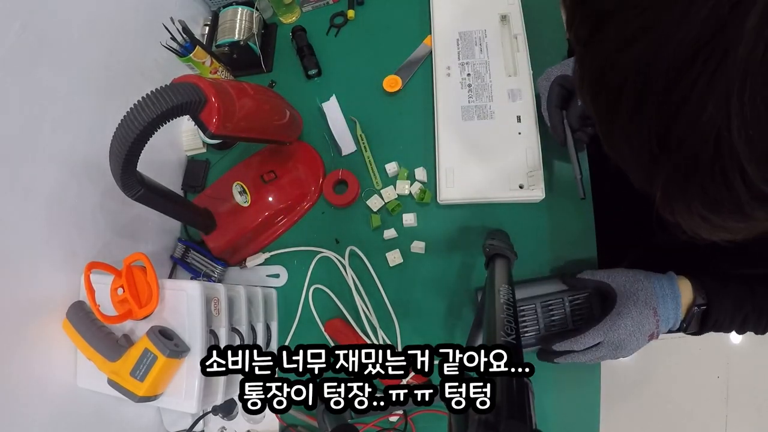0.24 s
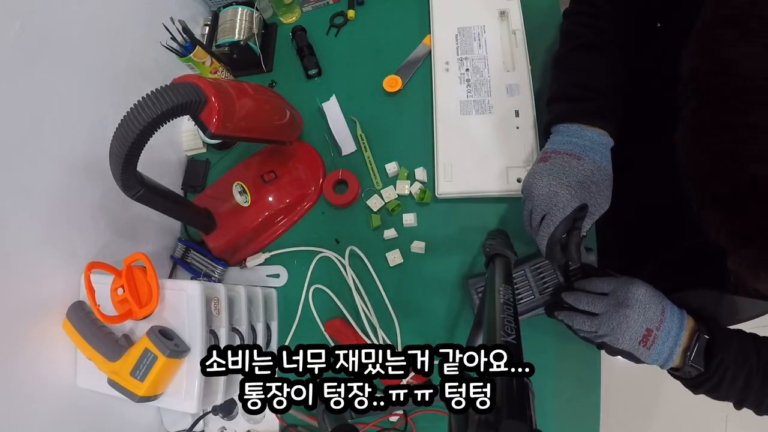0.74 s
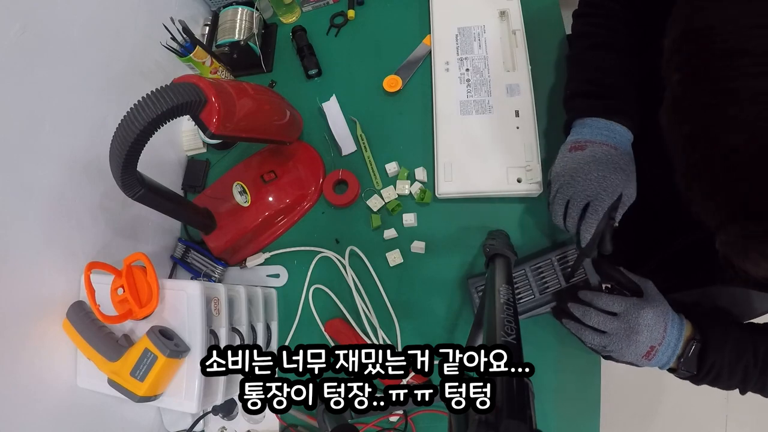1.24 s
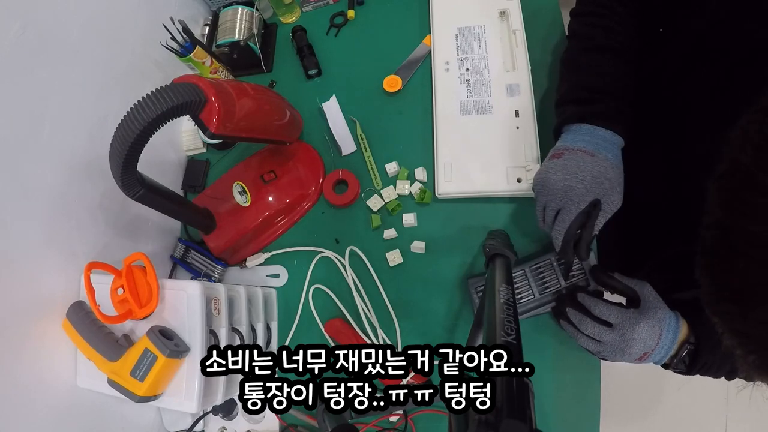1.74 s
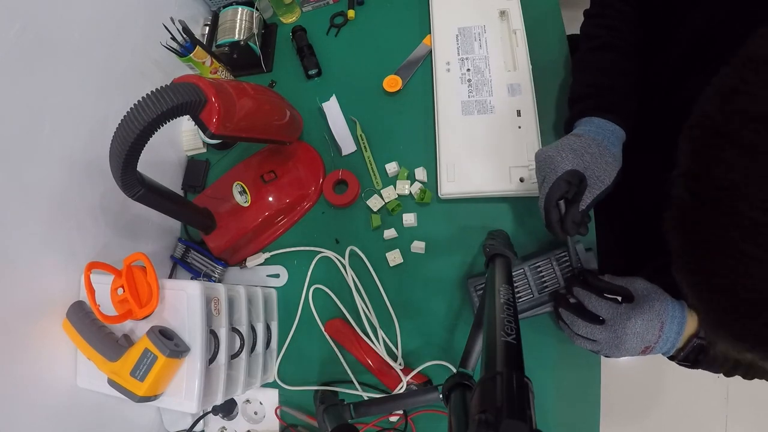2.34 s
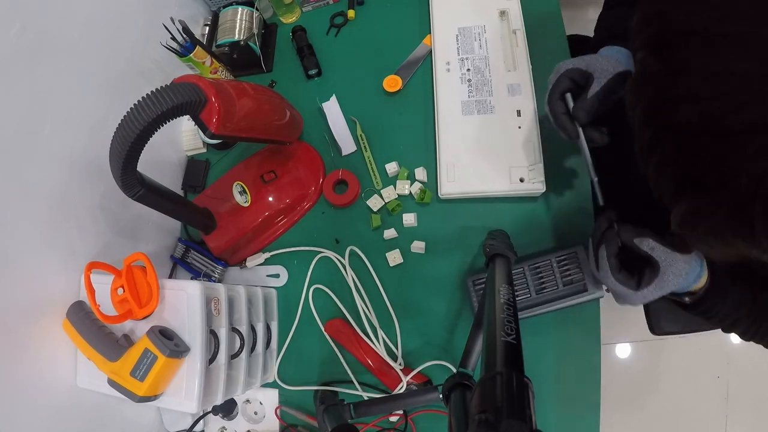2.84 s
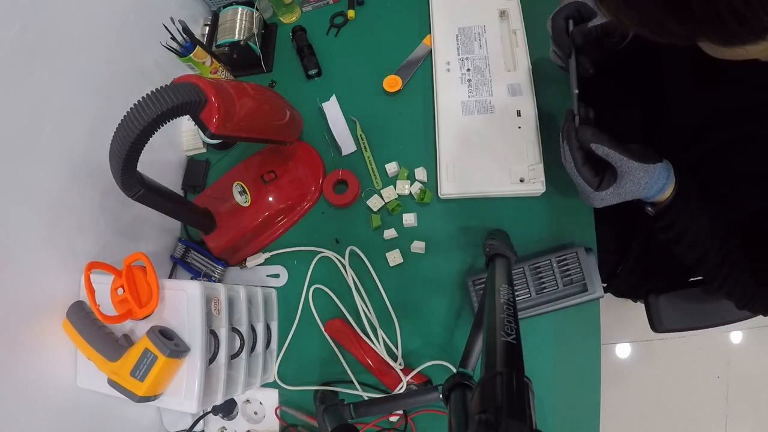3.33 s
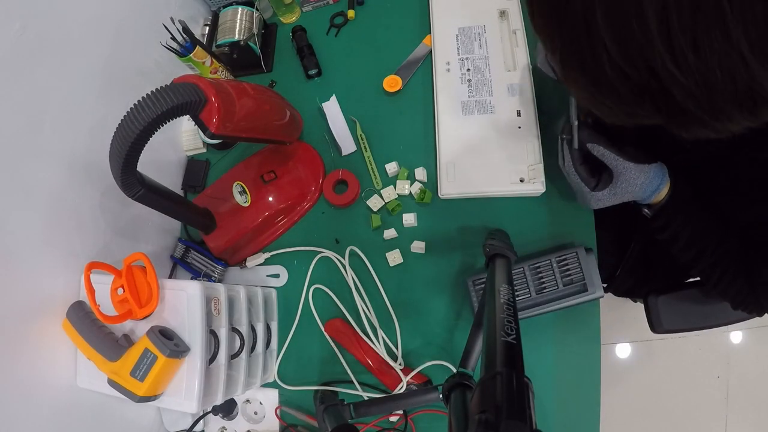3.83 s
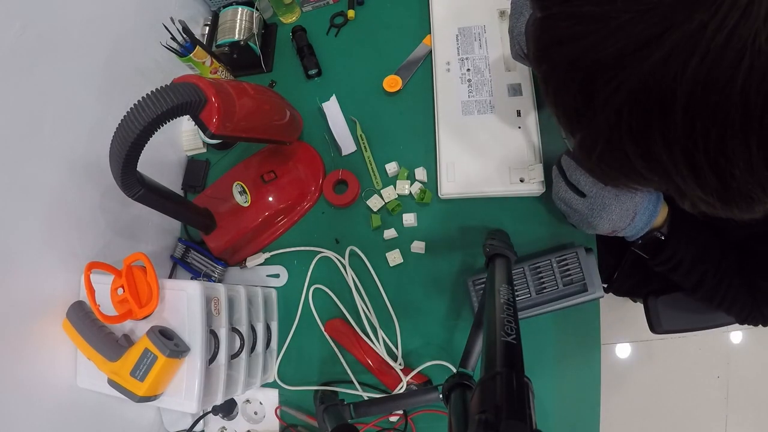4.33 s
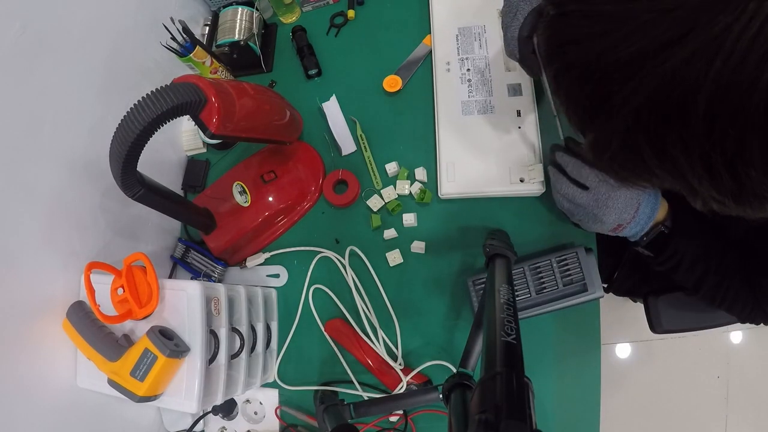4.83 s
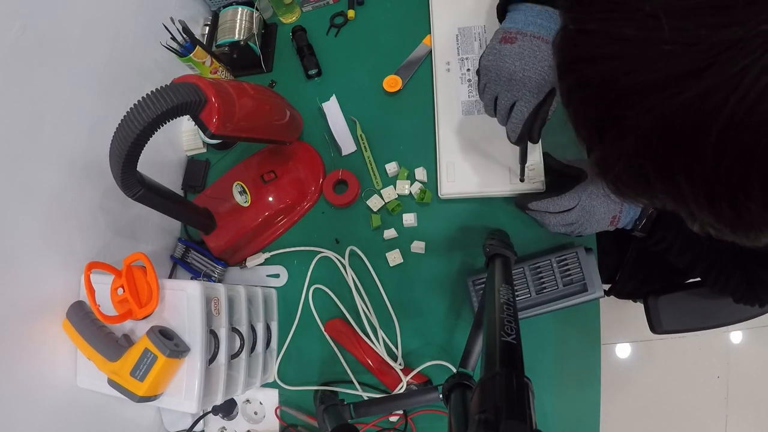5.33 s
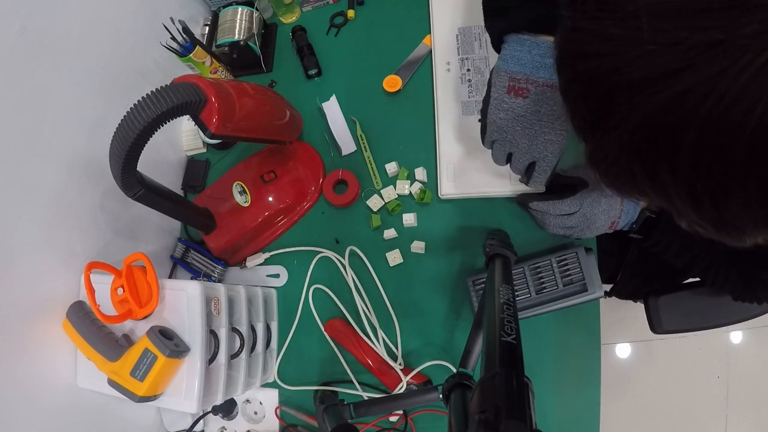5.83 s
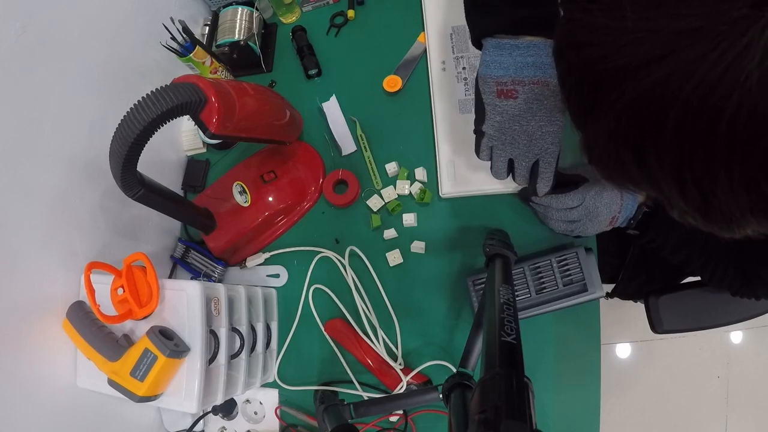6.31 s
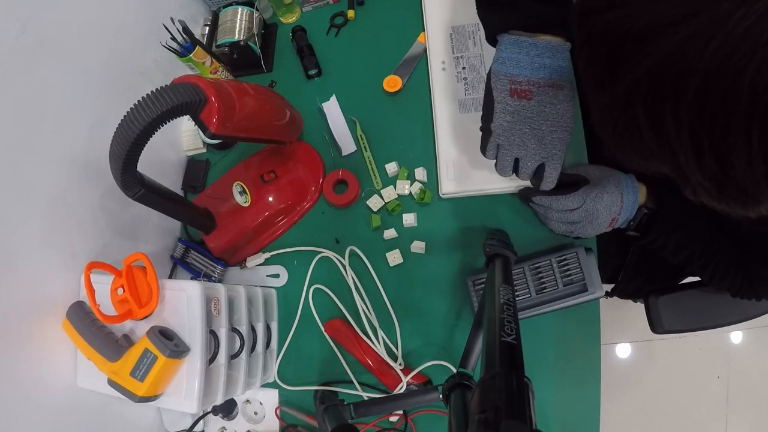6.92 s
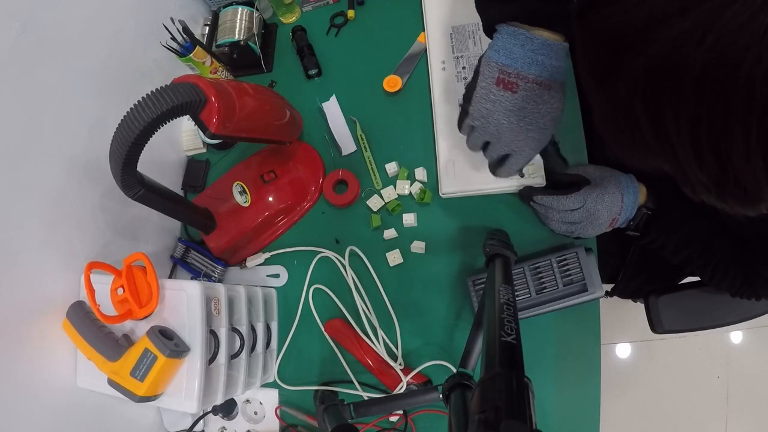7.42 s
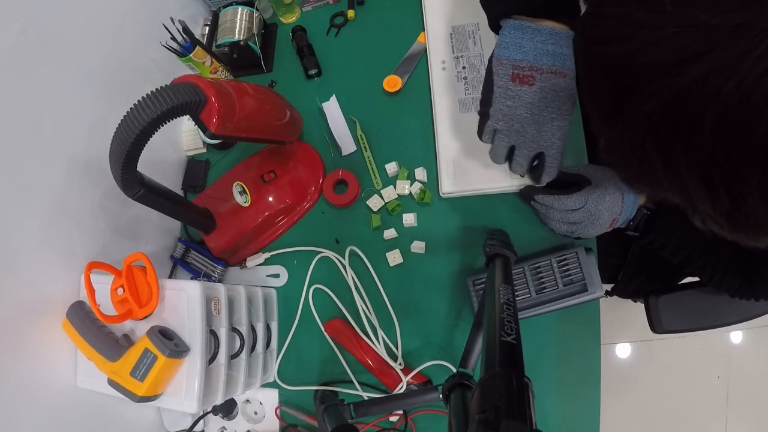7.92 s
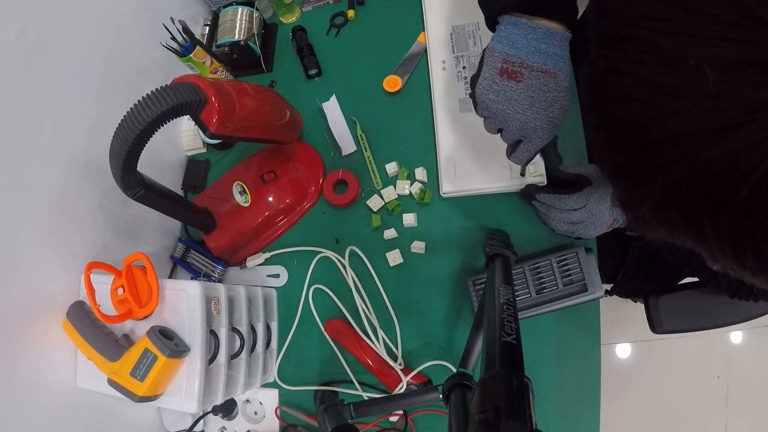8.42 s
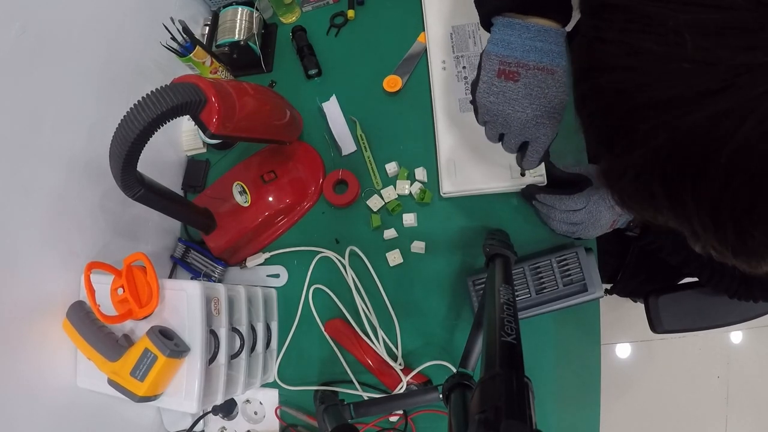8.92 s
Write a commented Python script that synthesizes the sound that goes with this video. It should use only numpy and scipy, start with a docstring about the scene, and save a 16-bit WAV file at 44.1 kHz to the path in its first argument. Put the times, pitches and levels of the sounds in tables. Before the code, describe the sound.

A close microphone on a desk stand picks up gloved hands working, in a hard room with a short tail and faint hum and hiss. From 0 to 0.55 s there are soft low thumps, brief plastic scrapes and a sleeve brushing. From 0.8 to 1.9 s a plastic tray is pushed with low rumble, hollow knocks and judders, leaning right; the sharpest, loudest snap comes at 1.6 s, smaller clicks at 1.9 and 2.3. From 2.4 to 4.7 s it is quieter: low chair-castor rumble, rustling clothes, faint low drones and tiny bright steel clinks, clearest near 3.8. A crisp click at 4.7 begins prying on a keyboard case. Firm snaps and thumps follow at 5.2 to 5.4, the strongest at 5.8. From 6 to 9.1 s many soft muffled knocks ride on uneven low rumble, with light plastic clicks around 8.5 to 8.7.

```python
"""Gloved hands pick tools from a plastic tray, then pry at the plastic case of a keyboard on a desk.
Snaps are short bursts of micro-slips ringing plastic modes, carried by the air of a hard room.
Knocks, pushes and friction drive the modes of a camera stand, whose thumps lean mostly to the right.
Plastic scrapes, a sleeve, a steel tool's clinks, drones and a chair's rumble are heard in between;
faint hum and hiss, made of wandering sines and coloured noise, lie behind."""
import sys
import numpy as np
from scipy import signal
from scipy.fft import rfft, irfft, next_fast_len
from scipy.io import wavfile
from scipy.ndimage import uniform_filter1d

SR = 44100
rng = np.random.default_rng(int(sys.argv[2]) if len(sys.argv) > 2 else 0)


def generate_wav(sig):
    """Save sig (samples, or channels by samples) to the path in sys.argv[1] as 16-bit PCM at SR."""
    pcm = np.round(np.clip(np.atleast_2d(sig).T, -1, 1) * 32767).astype(np.int16)
    wavfile.write(sys.argv[1], SR, pcm)


N = 403956  # samples

# Levels in the tables are relative: the functions may add gains or normalise.
# snaps at the tray: (time [s], level at 2.5-6 kHz [dB], at 1.2-2.5 kHz [dB], at 6-10 kHz [dB], length [s])
TRAY_CLICKS = [(0.3448, -47, -36.5, -58, 0.019), (0.986, -40, -41, -57, 0.039),
               (1.329, -28.5, -33.5, -26, 0.032), (1.443, -37, -40, -32, 0.012),
               (1.4484, -26.5, -32, -33, 0.0072), (1.6095, -22, -35, -29, 0.025),
               (1.6127, -12, -22.5, -13, 0.0094), (1.6152, -14, -32, -24, 0.014),
               (1.6215, -27, -43, -22.5, 0.005), (1.634, -47, -49, -39, 0.02),
               (1.659, -45, -52, -45, 0.0087), (1.6715, -46, -51, -33, 0.012),
               (1.9024, -43, -62, -62, 0.031), (1.913, -31, -47, -33, 0.052),
               (2.32, -33.5, -34.5, -64, 0.014)]
# snaps of the keyboard's case: (time [s], level at 2.5-6 kHz [dB], at 1.2-2.5 kHz [dB],
# at 6-10 kHz [dB], length [s])
CASE_CLICKS = [(4.7132, -27, -31, -18, 0.0068), (4.7208, -45, -54, -30, 0.034),
               (5.2088, -26.5, -29.5, -23, 0.031), (5.2175, -40, -48, -33, 0.01),
               (5.2255, -48, -53, -40, 0.0065), (5.315, -24.5, -37, -24, 0.04),
               (5.3705, -32.5, -33, -33, 0.025), (5.406, -28, -30.5, -31.5, 0.043),
               (5.8055, -37, -38, -30, 0.02), (5.8088, -15.5, -13, -17, 0.034),
               (5.816, -28, -23, -30, 0.035), (5.8215, -31, -32, -36, 0.02), (6.091, -49, -39, -45, 0.016),
               (6.105, -31, -33.5, -35.5, 0.067), (6.429, -42, -47, -42.5, 0.03),
               (6.508, -46, -46.5, -48, 0.045), (6.854, -46.5, -47, -48, 0.082),
               (6.96, -50, -63, -51, 0.14), (7.521, -50, -44.5, -60, 0.053), (7.912, -45, -65, -53, 0.055),
               (8.014, -54, -47, -71, 0.033), (8.293, -64, -41, -80, 0.063), (8.315, -57, -58, -45, 0.033),
               (8.4144, -69, -47, -84, 0.033), (8.468, -47, -43, -54, 0.02),
               (8.495, -31.5, -32.5, -35.5, 0.039), (8.546, -44, -42, -60, 0.096),
               (8.692, -32, -37, -38, 0.047), (8.702, -52, -52, -64, 0.035), (8.7395, -39, -37, -54, 0.17),
               (9.0079, -46, -54, -74, 0.1), (9.028, -44, -46.5, -66, 0.085), (9.0405, -42, -57, -63, 0.08),
               (9.097, -45.5, -55, -46.5, 0.089)]
# clinks of a steel tool in the hands: (time [s], level at 2.5-6 kHz [dB], at 1.2-2.5 kHz [dB],
# at 6-10 kHz [dB], length [s])
CLINKS = [(2.9904, -59, -65, -42.5, 0.054), (3.0114, -47, -66, -37, 0.093), (3.0514, -41, -64, -34.5, 0.1),
          (3.184, -39, -55, -34, 0.076), (3.2024, -44, -47, -33, 0.042), (3.359, -35.5, -50, -30.5, 0.009),
          (3.367, -58, -65, -41.5, 0.12), (3.7735, -30, -54, -28.5, 0.071), (3.792, -27.5, -48, -24, 0.079),
          (4.292, -61, -68, -47, 0.051), (4.4398, -51, -65, -46.5, 0.062), (4.7206, -38, -41.5, -34, 0.14)]
# modes of the tray: (frequency [Hz], width [Hz], level [dB])
TRAY_MODES = [(1190, 180, 10), (1710, 330, -7), (2940, 590, 5.5), (3440, 260, -4), (4020, 470, 7),
              (4900, 890, -3), (5950, 540, -2), (6820, 500, 5), (7500, 710, 7), (9300, 1200, -17),
              (14200, 1300, -5)]
# modes of the keyboard's case: (frequency [Hz], width [Hz], level [dB])
CASE_MODES = [(1170, 93, 10.5), (1290, 50, 8), (1460, 200, 2.5), (1780, 130, -2), (2130, 60, 0),
              (2500, 100, 7.5), (2960, 300, 2), (3220, 90, 8), (3456, 100, 8), (4300, 1600, -0.5),
              (5760, 360, -3), (6680, 540, 4.5), (7400, 450, 5), (9460, 730, -16), (12400, 2000, -29)]
# modes of the steel tool: (frequency [Hz], width [Hz], level [dB])
STEEL_MODES = [(1880, 730, -21), (3350, 89, -10), (5130, 310, -8.5), (6300, 680, -12.5), (7030, 160, -4),
               (7560, 230, 8), (7960, 100, 6), (8550, 180, -8), (12150, 900, -36), (14400, 900, -35)]
# blows on the desk: (time [s], thump level [dB], knock level [dB], clack level [dB],
# left minus right of the thump [dB], rattle length [s])
KNOCKS = [(0.028, -15.5, -59, -61, 2, 0.021), (0.068, -11.5, -55, -72, 7, 0.083),
          (0.097, -10.5, -50, -65, -1, 0.05), (0.212, -4.5, -44.5, -41, 1, 0.16),
          (0.3455, -18.5, -23, -32.5, -1.5, 0.045), (0.826, -13.5, -15.5, -35.5, -13, 0.16),
          (0.986, -8, -9, -41, -13, 0.28), (1.193, -9.5, -12.5, -47, -14, 0.072),
          (1.334, -12.5, -15.5, -56, -13, 0.11), (1.449, -6.5, 0.5, -43, -15, 0.077),
          (1.6155, -10, -3, -15.5, -19, 0.016), (1.912, -12.5, -18.5, -37, -11, 0.11),
          (2.325, -18, -25, -43, -8, 0.072), (5.148, -23, -30.5, -60, -11, 0.14),
          (5.211, -7, -6.5, -23, -8, 0.11), (5.319, -15.5, -18, -52, -9, 0.2),
          (5.372, -13.5, -17, -33.5, -3, 0.11), (5.408, -23, -13, -31.5, -10, 0.16),
          (5.59, -19.5, -44, -69, -9, 0.081), (5.66, -14.5, -22.5, -47.5, -11, 0.22),
          (5.811, -10, -5.5, -19, -17, 0.092), (6.02, -20, -28, -65, -8, 0.1),
          (6.074, -15, -18, -45, -15, 0.096), (6.106, -17, -14.5, -45, -7, 0.19),
          (6.241, -22.5, -28, -49, -7, 0.073), (6.342, -19, -36, -55, -16, 0.085),
          (6.433, -24.5, -23.5, -57, -6, 0.068), (6.492, -20, -24, -59, -11, 0.14),
          (6.569, -21, -27.5, -49, -14, 0.3), (6.756, -30, -30, -49, -11, 0.23),
          (6.804, -16, -28, -48, -10, 0.22), (6.85, -22, -34, -44, -14, 0.17),
          (6.961, -16.5, -21.5, -42.5, -13, 0.17), (7.089, -22.5, -25, -55.5, -13, 0.06),
          (7.208, -19, -29, -49, -14, 0.3), (7.301, -22.5, -32.5, -69, -13, 0.19),
          (7.519, -17, -26.5, -59, -8, 0.18), (7.588, -17, -25.5, -62, -11, 0.19),
          (7.816, -17.5, -25.5, -51, -18, 0.19), (7.863, -16, -29, -70, -9, 0.2),
          (7.996, -21.5, -23.5, -59, -18, 0.25), (8.257, -22, -27, -47, -9, 0.21),
          (8.345, -11.5, -27, -59, -10, 0.16), (8.466, -15.5, -24, -60, -9, 0.067),
          (8.536, -15.5, -15, -62, -13, 0.16), (8.742, -15, -14, -35.5, -24, 0.17),
          (8.95, -23, -31, -55, -12, 0.3)]
# modes of the camera stand: (frequency [Hz], width [Hz], level driven from the tray [dB],
# level driven from the keyboard [dB], left port's motion relative to the right's [ratio])
STAND_MODES = [(32.3, 7.6, 3.5, -12.5, 0.2), (48.9, 7.6, 2, 0, 0.24), (67.4, 37, -0.5, -5.5, -0.05),
               (127, 31, 0, -3.5, 0.24), (166.1, 9.1, -33, -6, -0.9), (234.3, 21.5, -14, -7.5, -0.4),
               (317, 28, -5, -18.5, -0.58), (427, 300, -25.5, -31, -3), (575.5, 23, -15.5, -13.5, -0.42),
               (639, 49, -25, -13.5, -0.54), (876, 96, -26, -33.5, 5), (1028, 37, -13.5, -23, -0.76),
               (1150, 190, -60, -39, -5), (1430, 170, -51, -38.5, 4)]
# soft pushes felt through the stand: (time [s], level [dB])
BUMPS = [(0.354, -14.5), (0.632, -29.5), (.70, -36), (0.753, -33.5), (0.906, -26.5), (1.034, -17.5),
         (1.08, -16.5), (1.148, -16), (1.217, -18.5), (1.268, -17.5), (1.301, -20), (1.359, -18),
         (1.394, -33), (1.426, -12.5), (1.483, -18), (1.618, -9), (1.666, -21.5), (5.174, -37),
         (5.218, -0.5), (5.33, -11), (5.379, -8.5), (5.434, -19.5), (5.507, -17.5), (5.544, -28),
         (5.691, -19), (5.731, -20), (5.778, -36), (5.827, -10), (5.844, -14.5), (5.99, -31),
         (6.033, -20.5), (6.136, -32), (6.197, -24), (6.269, -25), (6.519, -14), (6.548, -23), (6.592, -15),
         (6.63, -19.5), (6.683, -14.5), (6.763, -23), (6.816, -17), (6.897, -30), (6.98, -15.5),
         (7.019, -33), (7.103, -20), (7.135, -28), (7.176, -20.5), (7.249, -20.5), (7.276, -20.5),
         (7.322, -26.5), (7.399, -21), (7.544, -18.5), (7.57, -25), (7.619, -26), (7.675, -28.5),
         (7.725, -29), (7.762, -21), (7.83, -21), (7.89, -27.5), (7.929, -25), (8.02, -21.5),
         (8.049, -16.5), (8.082, -27.5), (8.145, -26.5), (8.193, -21.5), (8.286, -21.5), (8.311, -22),
         (8.43, -21.5), (8.547, -15), (8.559, -14.5), (8.578, -33.5), (8.606, -31.5), (8.636, -28.5),
         (8.674, -22.5), (8.716, -15), (8.761, -13.5), (8.778, -15.5), (8.79, -17.5), (8.901, -29),
         (8.976, -28)]
# hands lean on the tray: (time [s], sway level [dB], grip friction level [dB])
TRAY_EFFORT = [(0, -51, -54), (.08, -32.5, -43), (.5, -36.5, -35.5), (.64, -28.5, -51), (.76, -29.5, -42.5),
               (.87, -18.5, -29.5), (1.02, -21.5, -28), (1.3, -24.5, -24.5), (1.48, -21, -38),
               (1.66, -20, -40.5), (1.83, -31.5, -64), (1.96, -20.5, -64), (2.08, -36, -60),
               (2.15, -43, -57), (2.19, -39, -38), (2.42, -42, -59)]
# hands lean on the keyboard as it is pried: (time [s], sway level [dB], grip friction level [dB])
CASE_EFFORT = [(3.95, -48.5, -60), (5.11, -40, -51), (5.17, -29.5, -47), (5.24, -13.5, -31),
               (5.31, -29.5, -35), (5.4, -15.5, -33), (5.57, -29.5, -40), (5.69, -19, -33.5),
               (5.84, -19.5, -48), (5.91, -22.5, -41.5), (6.05, -23.5, -35.5), (6.4, -21.5, -41),
               (6.55, -16, -38), (6.72, -18, -43.5), (7.45, -19, -47), (7.75, -17.5, -39),
               (8.3, -18.5, -34.5), (8.6, -21, -40.5), (8.98, -18, -39), (9.04, -30, -53), (9.16, -34, -52)]
# the grip eases between pushes: (time [s], depth [dB], half length [s])
EASES = [(1.56, -5.5, 0.027), (5.465, -1, 0.011), (5.735, -6, 0.014), (5.9, -4.5, 0.023),
         (6.405, -7, 0.013), (6.93, -11, .015), (7.05, -6, 0.024), (7.45, -7, 0.028), (7.71, -6, 0.016),
         (7.96, -11, 0.012), (8.11, -9, 0.015), (8.86, -2.5, 0.027)]
# the tool grates along the case's seam: (time [s], level [dB], half length [s])
PRIES = [(6.103, -51.5, 0.015), (6.58, -64, 0.018), (7.573, -65, 0.018), (7.88, -65, 0.02),
         (8.093, -59.5, 0.0078), (8.317, -66, 0.024), (8.359, -62, 0.016), (8.54, -59, 0.018),
         (8.745, -60, 0.036), (9.048, -74, 0.027)]
# the tray drags in short judders: (time [s], level [dB], half length [s])
DRAGS = [(0.832, -41.5, 0.0095), (1, -37.5, 0.014), (1.141, -43.5, 0.01), (1.182, -34, 0.0083),
         (1.209, -36, 0.013), (1.333, -44, 0.014), (1.44, -40, 0.0075), (1.673, -47, 0.0093)]
# spectrum of the dragging tray: (frequency [Hz], level [dB])
JUDDER_SPECTRUM = [(300, -22), (560, -6), (780, -28), (860, -3.5), (925, 5), (985, -6), (1065, -2),
                   (1150, -26), (2100, -34), (2750, -24.5), (3400, -34.5), (7000, -30), (11000, -51),
                   (15000, -79)]
# plastic sliding over plastic: (time [s], level [dB])
SLIDE_LEVEL = [(0, -63), (.06, -55), (.088, -33.5), (.135, -37), (.16, -40), (.24, -47), (.39, -55.5),
               (.42, -45.5), (.46, -43), (.5, -50.5), (.542, -48.5), (.552, -90)]
# spectrum of that scrape: (frequency [Hz], level [dB])
SCRAPE_SPECTRUM = [(240, -39.5), (400, -2.5), (593, -23.5), (690, -28), (1500, -15.5), (1970, -17),
                   (2470, -14), (3610, -16), (4960, -21), (6510, -20), (9810, -27), (15000, -56)]
# treble of the second stroke: (time [s], level [dB])
SKIM_LEVEL = [(.405, -70), (.43, -49), (.46, -54), (.5, -53), (.544, -59), (.552, -97)]
# spectrum of that treble: (frequency [Hz], level [dB])
SKIM_SPECTRUM = [(2500, -29.5), (5500, -7), (7000, 1), (10000, -1.5), (11500, -19.5), (14500, -17.5),
                 (15500, -39)]
# a sleeve brushes the desk: (time [s], level [dB])
SLEEVE_LEVEL = [(0, -51), (.07, -45), (.2, -35.5), (.28, -50.5), (.34, -49), (.38, -43), (.45, -39),
                (.5, -36.5), (.543, -37.5), (.551, -85)]
# spectrum of the brushing cloth: (frequency [Hz], level [dB])
CLOTH_SPECTRUM = [(120, -36), (250, -1.5), (400, 0.5), (580, -2), (720, -14), (950, -8.5), (1200, -24),
                  (1500, -11), (2200, -51), (5000, -62.5)]
# scraping of the tray's ridge: (time [s], level [dB])
GRIT_LEVEL = [(.07, -60), (.088, -47), (.115, -38), (.14, -38), (.16, -49), (.2, -64)]
# modes of the ridge: (frequency [Hz], width [Hz], level [dB])
RIDGE_MODES = [(2430, 270, 0.5), (3140, 340, -4), (3440, 260, -5), (4430, 210, -12)]
# a faint squeak: (time [s], level [dB])
SQUEAK_LEVEL = [(.71, -75), (.74, -59), (.84, -61), (.93, -62), (.96, -76)]
# blows that make the tray ring: (time [s], level [dB])
TRAY_RINGS = [(0.214, -3), (1.456, 2), (2.322, 0.5)]
# hollow modes of the tray: (frequency [Hz], width [Hz], level [dB])
HOLLOW_MODES = [(488, 19, -55), (582, 21, -61), (640, 8.2, -73), (927, 32, -77)]
# chair and clothes: (time [s], castor roll level [dB], wheel rattle level [dB], rustle level [dB])
CHAIR_LEVELS = [(2.18, -28.5, -46, -52.5), (2.25, -38, -45, -57.5), (2.41, -49, -50.5, -57.5),
                (2.56, -35, -44.5, -57.5), (2.74, -38.5, -44, -56), (3, -37.5, -47.5, -51.5),
                (3.31, -30, -46, -47.5), (3.67, -30.5, -48.5, -52.5), (4.11, -34.5, -62, -68),
                (4.5, -36.5, -64, -85), (4.95, -36, -57.5, -73), (5.12, -38, -58, -83)]
# spectrum of the rolling castors: (frequency [Hz], level [dB])
ROLL_SPECTRUM = [(15, -10), (25, 11), (44, -6.5), (65, -1.5), (80, -3), (92, -0.5), (108, 0.5), (125, 1),
                 (140, 1.5), (165, -10.5), (210, -33), (320, -57), (600, -91)]
# spectrum of the rattling wheels: (frequency [Hz], level [dB])
WHEEL_SPECTRUM = [(120, -20), (200, 7), (250, 0.5), (290, -9), (360, -5), (420, -7), (520, -7.5),
                  (700, -14.5), (1000, -21), (2000, -68.5)]
# spectrum of the rustling clothes: (frequency [Hz], level [dB])
RUSTLE_SPECTRUM = [(350, -57.5), (750, -4), (1100, -4), (1700, -6.5), (2400, -8), (3300, -9), (6000, -16),
                   (8500, -13), (11000, -27.5), (14000, -60.5)]
# low drones: (frequency [Hz], rms level at the loudest [dB], time of the loudest [s], half length [s])
DRONES = [(83.4, -39, 2.85, 0.37), (83.5, -42, 3.44, 0.15), (108.7, -38, 3.69, 0.29),
          (120.7, -42, 3.13, 0.13), (136.5, -40.5, 4.9, 0.7), (248.4, -54, 3.13, 0.39)]
# tones of a faint machine hum: (frequency [Hz], level [dB])
HUM_TONES = [(108.7, -55.5), (136, -52), (248.4, -62), (672.9, -75.5), (829.0, -84)]
# course of the hum: (time [s], level [dB])
HUM_LEVEL = [(0, 16.5), (1.9, -6), (2.3, 8), (3, 14), (5.1, -8), (5.3, -0.5), (9.16, 3)]
# the room's own noise: (time [s], level [dB])
AIR_LEVEL = [(0, -48), (.3, -60), (.75, -53.5), (1.25, -50), (1.58, -55.5), (1.95, -62), (2.3, -58.5),
             (3, -80), (3.3, -59), (3.83, -49.5), (4.4, -54), (5.2, -54.5), (5.6, -59), (7.3, -61.5),
             (8.1, -58), (9.16, -63)]
# spectrum of that noise: (frequency [Hz], level [dB])
HISS_SPECTRUM = [(300, 0.5), (710, -5.5), (1200, -9), (2400, -13), (3320, -14), (4200, -19), (7480, -15),
                 (8240, -18.5), (9780, -20.5), (11500, -28), (13500, -36), (15200, -60.5)]
# decay of the room: (frequency [Hz], time to fall 60 dB [s])
WALLS = [(200, 0.39), (1000, 0.68), (3000, 0.56), (8000, 0.51), (14000, 0.52)]
# width of the stereo image: (time [s], share of the side signal [ratio])
IMAGE_WIDTH = [(0, 0), (.546, 0), (.552, 1), (2.3, 1), (2.5, .35), (3.7, .35), (3.78, 1)]


def amp(db):
    """Decibel law: level to amplitude ratio."""
    return 10 ** (np.asarray(db) / 20)


def unit(x):
    """RMS normalisation of the ports' mean signal to 1."""
    return x / (np.atleast_2d(x).mean(0).std() + 1e-12)


def peaking(x, db):
    """Peak normalisation of the ports' mean signal to db."""
    return x * amp(db) / (np.abs(x.mean(0)).max() + 1e-12)


def along(points, hz):
    """Linear interpolation of (frequency, value) points on a logarithmic frequency axis."""
    f, values = np.transpose(points)
    return np.interp(np.log(hz + 1), np.log(f + 1), values)


def curves(rows):
    """Piecewise-linear level for each column after the time, fading to -100 dB outside the rows."""
    s, *columns = np.transpose(rows)
    edges = np.r_[s[0] - .05, s, s[-1] + .1]
    return [np.interp(np.arange(N) / SR, edges, np.r_[-100, c, -100]) for c in columns]


def strokes(rows):
    """Gaussian swells of amplitude, summed."""
    out, t = np.zeros(N), np.arange(-SR // 4, SR // 4) / SR
    for s, db, half in rows:
        add(out, s + t[0], amp(db) * np.exp(-.5 * (t / half) ** 2))
    return out


def contact(t, lead_in, length):
    """Contact force: exponential growth to time zero, then decay, each by 60 dB in its given time."""
    return amp(-60 * np.maximum(-t / max(lead_in, .001), t / max(length, .004)))


def wobble(rate):
    """Band-limited random modulation with rate knots a second."""
    fine = signal.resample_poly(rng.standard_normal(int(N * rate / SR) + 4), 8, 1)
    return np.interp(np.arange(N) * 8 * rate / SR, np.arange(len(fine)), fine)


def filtered(x, response):
    """Linear filtering: the spectrum times a complex response of frequency."""
    n = x.shape[-1]
    m = next_fast_len(n + 8192)
    return irfft(rfft(x, m) * response(np.fft.rfftfreq(m, 1 / SR)), m)[..., :n]


def passband(lo_hz, hi_hz):
    """Causal Butterworth band-pass, as second-order sections."""
    return signal.butter(3, [lo_hz, hi_hz], 'band', fs=SR, output='sos')


def band(x, lo_hz, hi_hz):
    """Band limitation of x."""
    return signal.sosfilt(passband(lo_hz, hi_hz), x)


def ring(hz, width, db, size=11025):
    """Damped resonance: impulse response whose decay rate is set by its bandwidth."""
    t = np.arange(size) / SR
    return amp(db) * width * np.exp(-np.pi * width * t) * np.cos(2 * np.pi * hz * t)


def add(track, s, sound):
    """Superposition: mix a sound in at a time in seconds."""
    part = track[..., max(round(s * SR), 0):][..., :sound.shape[-1]]
    part += sound[..., :part.shape[-1]]


def ports(pair, width):
    """Partial correlation: two unrelated signals become a left and a right that are partly alike."""
    return np.array([pair[0] + width * pair[1], pair[0] - width * pair[1]])


def rush(spectrum, width):
    """Spectral shaping of partly correlated stereo noise."""
    noise = ports(rng.standard_normal((2, N)), width)
    return unit(filtered(noise, lambda hz: amp(along(spectrum, hz))))


def stand_answer(at_tray, shift=1, damping=1, size=8000):
    """Modal superposition at both ports; a hand's load shifts and damps, sideways modes oppose."""
    modes = []
    for hz, width, tray_db, case_db, left in STAND_MODES:
        mode = ring(hz * shift, width * damping, tray_db if at_tray else case_db, size=size)
        modes.append(np.outer([left, 1], mode))
    return sum(modes)


def shaken(answer, grip):
    """Random vibration: the stand driven by friction of a given strength."""
    return signal.oaconvolve((grip * rng.standard_normal(N))[None], answer, axes=1)[:, :N]


def clicks(events, modes, detune, crack, width, chatter_db, release, gain_db, lead_share, sizzle_db):
    """Stick-slip excitation of modes: bursts of micro-slips ring the part slightly differently each time."""
    out, t = np.zeros((2, N)), np.arange(-SR // 25, SR // 12) / SR
    edges = [(1100, 2500), (2500, 6000), (6000, 9800), (10000, 15000)]  # Hz
    bands = [passband(*pair) for pair in edges]
    for s, mid, low, high, length in events:
        body = sum(ring(hz * (1 + detune * rng.standard_normal()), w, db, size=2000) for hz, w, db in modes)
        body = body / np.linalg.norm(body)
        body[0] += crack  # unresonant part of the snap
        slips = np.interp(t, t[::40], rng.standard_normal(len(t[::40])))
        force = ports(rng.standard_normal((2, len(t))), width)
        force = force * amp(chatter_db * slips) * contact(t, lead_share * length, length)
        force = force + release * (t == 0)  # the catch lets go at once
        snap = signal.fftconvolve(force, body[None], axes=1)[:, :len(t)]
        for sos, db in zip(bands, (low, mid, high, high + sizzle_db)):
            add(out, s + t[0], peaking(signal.sosfilt(sos, snap), db + gain_db))
    return out


def from_right(x, lag_s=2.4e-5):
    """Interaural-style delay: sound from the right reaches the left port lag_s later."""
    side = np.array([[1], [-1]])
    return filtered(x, lambda hz: np.exp(-1j * np.pi * hz * lag_s * side))


def knocks(rattle, lead_in, thump_db, knock_db, clack_db, firmness=0.85, detune=0.026):
    """Impact response of the stand: strong blows are mostly impulse, weak ones mostly rattle."""
    out, t = np.zeros((2, N)), np.arange(-SR // 25, SR // 5) / SR
    tray_band, case_band = passband(105, 222.4), passband(135, 255.4)
    knock_band, clack_band = passband(286, 660), passband(737, 1440)
    for s, thump, knock, clack, pan, length in KNOCKS:
        at_tray = s < 4
        blow = amp(firmness * (thump + 25.0)) * (t == 0)
        force = blow + rattle * rng.standard_normal(len(t)) * contact(t, lead_in, length)
        answer = stand_answer(at_tray, 1 + detune * rng.standard_normal(), size=5000)
        shake = signal.fftconvolve(force[None], answer, axes=1)[:, :len(t)]
        low = signal.sosfilt(tray_band if at_tray else case_band, shake[1]) * amp([[pan], [0]])
        # the lower bands start a few milliseconds earlier
        add(out, s + t[0] - .003, peaking(low, thump + thump_db))
        add(out, s + t[0] - .001, peaking(signal.sosfilt(knock_band, shake), knock + knock_db))
        add(out, s + t[0], peaking(signal.sosfilt(clack_band, shake), clack + clack_db))
    return out


def bumps(half_s=0.0055, damping=0.9, detune=0.048, pan_db=-9, firm_hz_per_db=3, gain_db=-4.5):
    """Soft-contact excitation: a gloved push is a swell of random force, brighter the harder it is."""
    low_hz, high_hz = 125, 265
    out, t = np.zeros((2, N)), np.arange(-SR // 40, SR // 10) / SR
    usual_db = np.mean([db for s, db in BUMPS])
    for s, db in BUMPS:
        # the hand stays on and alters the stand's tuning and damping
        answer = stand_answer(s < 4, 1 + detune * rng.standard_normal(), damping, size=3500)[1]
        force = rng.standard_normal(len(t)) * np.exp(-.5 * (t / half_s) ** 2)
        firm_hz = max(firm_hz_per_db * (db - usual_db), 0)
        shake = signal.fftconvolve(force, answer)[:len(t)]
        shake = signal.sosfilt(passband(low_hz + firm_hz, high_hz + firm_hz), shake)
        add(out, s + t[0], peaking(shake * amp([[pan_db], [0]]), db + gain_db))
    return out


def handling(effort, slips, at_tray, sway_db, press_db, grind_db, slip_db, lumps_db, surge_db, crackle_db=8):
    """Forced vibration: leaning sways the stand, and uneven grip friction crackles in its upper modes."""
    sway, press = curves(effort)
    answer = stand_answer(at_tray)
    lowpass = signal.butter(6, 104, fs=SR, output='sos')
    slow = unit(signal.sosfilt(lowpass, band(shaken(answer, 1), 19.3, 90.0)))
    power = np.abs(uniform_filter1d(slow.mean(0) ** 2, size=3000))
    slow = slow / np.sqrt(power + 0.014)  # an even push
    unevenness_db = lumps_db * np.tanh(wobble(45)) + crackle_db * np.tanh(wobble(350))
    friction = shaken(answer, amp(unevenness_db))
    grind = amp(press + grind_db) + amp(slip_db) * strokes(slips)  # more while something slips
    rub = amp(press + press_db) * unit(band(friction, 126, 384))
    rub = rub + grind * unit(band(friction, 480, 1290))
    hold = np.clip(1 - strokes(EASES), 0, 1)
    surge = amp(sway + sway_db + surge_db * np.tanh(wobble(12)))
    return surge * slow * np.sqrt(hold + 0.012) + rub * hold


def prying(rate=900, spread_db=5):
    """Random impulse train: gritty micro-slips of the tool, rate a second, tick the case's modes."""
    slips = (rng.random(N) < rate / SR) * amp(spread_db * rng.standard_normal(N))
    ticks = ports(rng.standard_normal((2, N)), .4) * slips
    body = band(sum(ring(*mode) for mode in CASE_MODES), 900, 8000)
    return strokes(PRIES) * unit(signal.oaconvolve(ticks, body[None], axes=1)[:, :N])


def drags(grain_db=3):
    """Frictional judder: the tray rubs the foot of the stand, which rocks sideways near 1 kHz."""
    return strokes(DRAGS) * unit(rush(JUDDER_SPECTRUM, width=1.5) * amp(grain_db * wobble(300)))


def slide(grain_db=0.5, sleeve_db=-1):
    """Sliding friction as shaped noise: two plastic strokes, the second brighter, and a brushing sleeve."""
    grain = amp(grain_db * wobble(540))
    scrape = amp(curves(SLIDE_LEVEL)[0]) * unit(rush(SCRAPE_SPECTRUM, width=.2) * grain)
    skim = amp(curves(SKIM_LEVEL)[0]) * rush(SKIM_SPECTRUM, width=.2)
    sleeve = amp(curves(SLEEVE_LEVEL)[0] + sleeve_db) * rush(CLOTH_SPECTRUM, width=.3)
    return scrape + skim + sleeve


def grit(rate=520, spread_db=4.5):
    """Random impulse train: plastic teeth catch on a ridge of the tray in tiny ticks, rate a second."""
    catches = (rng.random(N) < rate / SR) * amp(spread_db * rng.standard_normal(N))
    ticks = ports(rng.standard_normal((2, N)), .2) * catches
    body = band(sum(ring(*mode, size=1000) for mode in RIDGE_MODES), 1900, 4000)
    return amp(curves(GRIT_LEVEL)[0]) * unit(signal.oaconvolve(ticks, body[None], axes=1)[:, :N])


def tray_tones(squeak_hz=1680, waver=1.6):
    """Phase-modulated squeak while the tray is turned, and free vibration of the tray when knocked."""
    t = np.arange(N) / SR
    out = amp(curves(SQUEAK_LEVEL)[0]) * np.sin(2 * np.pi * squeak_hz * t + waver * wobble(60))
    hollow = band(sum(ring(*mode) for mode in HOLLOW_MODES), 360, 1550)
    for s, db in TRAY_RINGS:
        add(out, s, amp(db) * hollow)
    return out


def chair(roll_db=-1, wheel_db=1, rustle_db=0):
    """Rolling noise by spectral shaping: castors rumble and rattle over the floor while clothes rustle."""
    roll, wheels, rustle = curves(CHAIR_LEVELS)
    rumble = amp(roll + roll_db) * rush(ROLL_SPECTRUM, width=0.12)
    rattle = amp(wheels + wheel_db) * rush(WHEEL_SPECTRUM, width=0.04)
    return rumble + rattle + amp(rustle + rustle_db) * rush(RUSTLE_SPECTRUM, width=.15)


def drones(drift=0.89):
    """Amplitude modulation: nearly pure low tones under slow Gaussian swells, drift in radians."""
    t = np.arange(N) / SR
    out = np.zeros(N)
    for hz, db, s, half in DRONES:
        swell = np.exp(-.5 * ((t - s) / half) ** 2)
        tone = np.sqrt(2) * np.sin(2 * np.pi * hz * t + drift * wobble(3.1))
        out += amp(db) * swell * tone
    return out


def hum(drift=0.28, hum_db=-2):
    """Additive synthesis: a machine's steady tones with slightly wandering phase, drift in radians."""
    t = np.arange(N) / SR
    out = np.zeros(N)
    for hz, db in HUM_TONES:
        out += amp(db) * np.sqrt(2) * np.sin(2 * np.pi * hz * t + drift * wobble(4.8))
    return amp(curves(HUM_LEVEL)[0] + hum_db) * out


def air(hiss_db=1):
    """Broadband noise: the room's soft hiss, coloured by its spectrum."""
    return amp(curves(AIR_LEVEL)[0] + hiss_db) * rush(HISS_SPECTRUM, width=0.72)


def room(x, width=0.86):
    """Diffuse reverberation: energy decays exponentially at its own speed in each frequency band."""
    hz, t, z = signal.stft(x.mean(0), SR, nperseg=256)
    delay = t[:SR // 128]
    decay = amp(-120 * delay / along(WALLS, hz)[:, None]) * (delay > .007)  # of power, after 7 ms
    decay = decay / decay.sum(1, keepdims=True)
    power = signal.fftconvolve(np.abs(z) ** 2, decay, axes=1)[:, :len(t)]
    scatter = signal.stft(ports(rng.standard_normal((2, N)), width), SR, nperseg=256)[2]
    tail = scatter / scatter.std() * np.sqrt(np.abs(power))
    return signal.istft(tail, SR, nperseg=256)[1][:, :N]


def scene(click_room_db=-8, knock_room_db=-14):
    """Superposition of sources: snaps, tool, tray tones and the blows' upper band excite the room."""
    snaps = clicks(TRAY_CLICKS, TRAY_MODES, detune=0.042, crack=0.067, width=0.094, chatter_db=7,
                   release=3.0, gain_db=-2.0, lead_share=1.0, sizzle_db=-38.5)
    snaps = snaps + clicks(CASE_CLICKS, CASE_MODES, detune=0.013, crack=0.12, width=0.39, chatter_db=6.0,
                           release=5.7, gain_db=-2.0, lead_share=0.08, sizzle_db=-24.5)
    clinks = clicks(CLINKS, STEEL_MODES, detune=0.0082, crack=0.046, width=0.17, chatter_db=4.0,
                    release=1.7, gain_db=3, lead_share=0.67, sizzle_db=-14.5)
    airborne = from_right(snaps) + clinks + prying() + tray_tones()
    blows = knocks(rattle=0.3, lead_in=0.012, thump_db=-2.0, knock_db=-10.5, clack_db=-1.0)
    wet = room(amp(click_room_db) * airborne + amp(knock_room_db) * band(blows, 300, 1600))
    hands = handling(TRAY_EFFORT, DRAGS, True, sway_db=2.5, press_db=-3, grind_db=-30.0,
                     slip_db=-31, lumps_db=11, surge_db=4.0)
    hands = hands + handling(CASE_EFFORT, PRIES, False, sway_db=1.46, press_db=0.5, grind_db=-24.5,
                             slip_db=5.0, lumps_db=3.5, surge_db=1.5)
    contacts = airborne + blows + bumps() + hands + drags() + slide() + grit()
    return contacts + wet + chair() + drones() + hum() + air()


def record(dry, top_hz=15200):
    """Mid-side width control from mono outward, soft saturation of peaks, and a sharp band limit."""
    mid = dry.mean(0)
    pair = mid + (dry - mid) * np.interp(np.arange(N) / SR, *np.transpose(IMAGE_WIDTH))
    held = pair / (1 + np.abs(pair) ** 8) ** (1 / 8)
    return filtered(held, lambda hz: hz < top_hz)


dry = scene()
out = record(dry)
generate_wav(out)
```